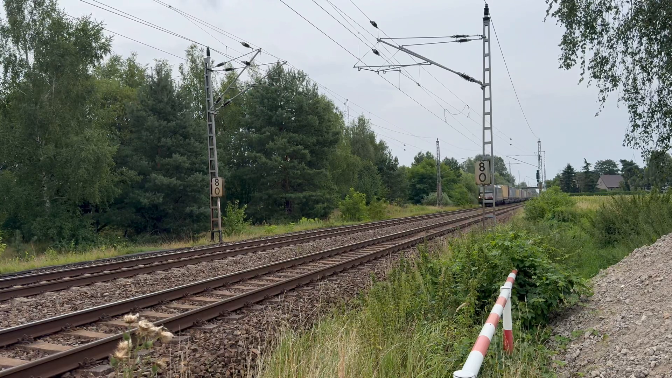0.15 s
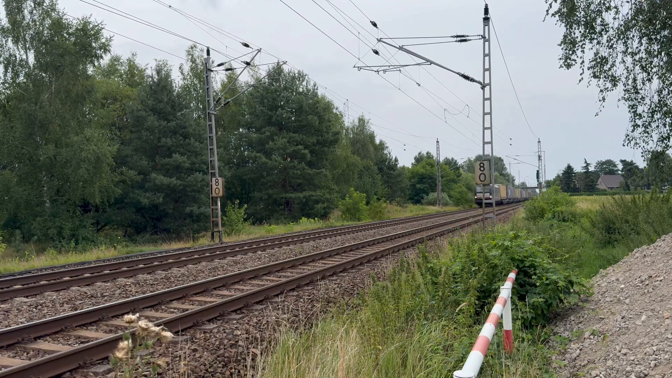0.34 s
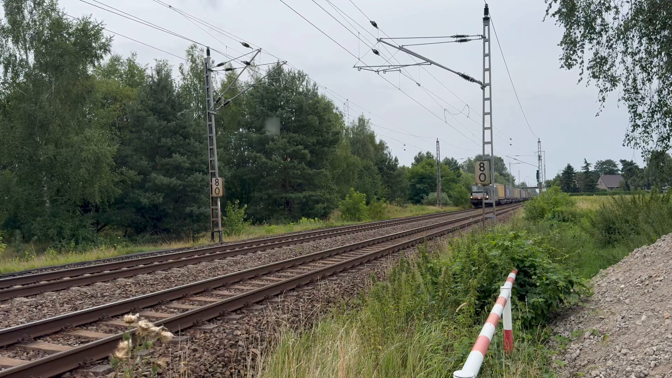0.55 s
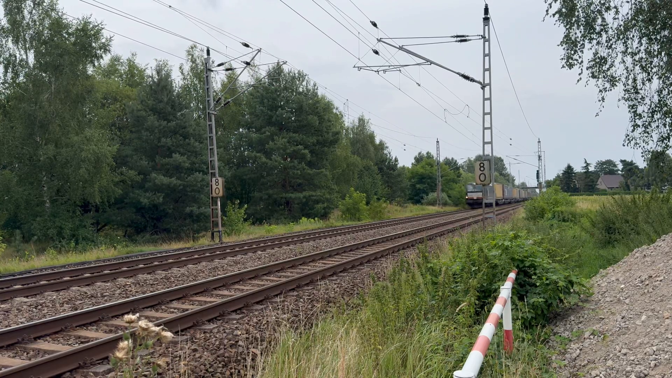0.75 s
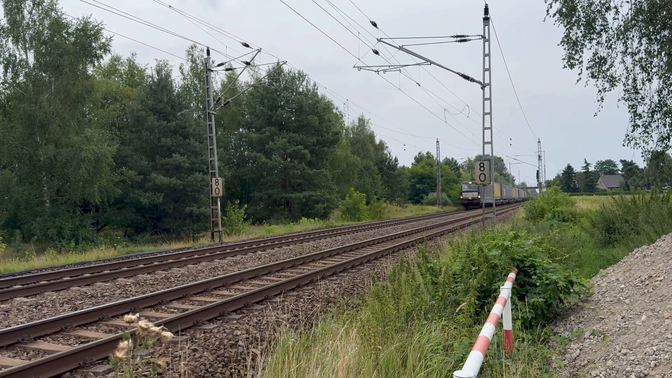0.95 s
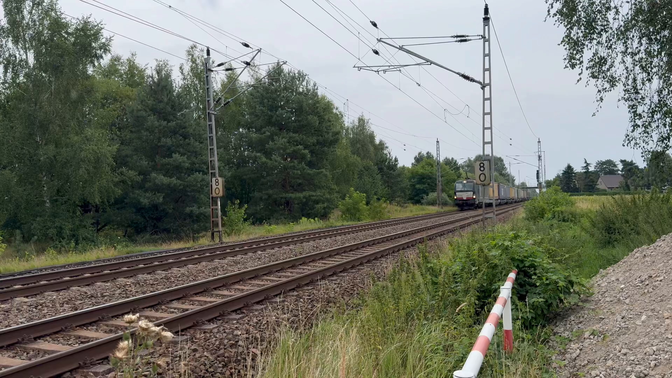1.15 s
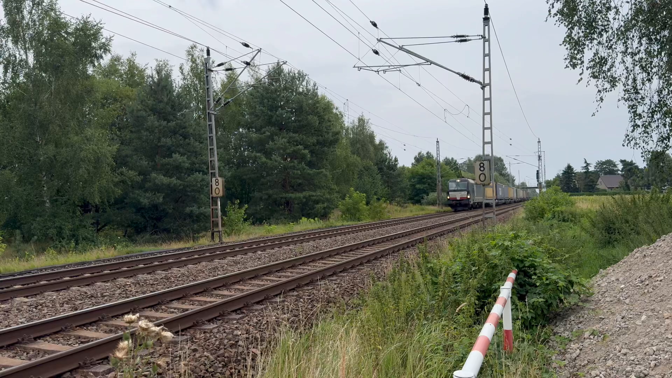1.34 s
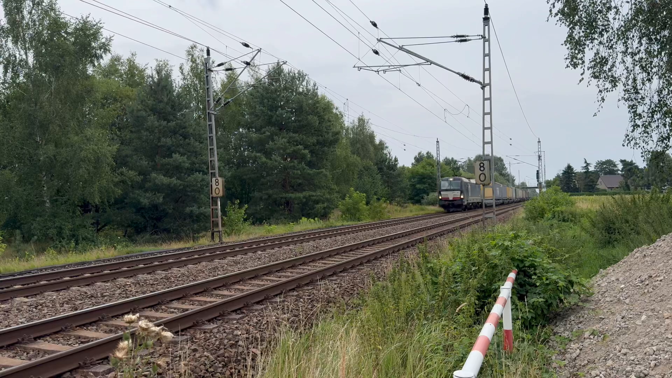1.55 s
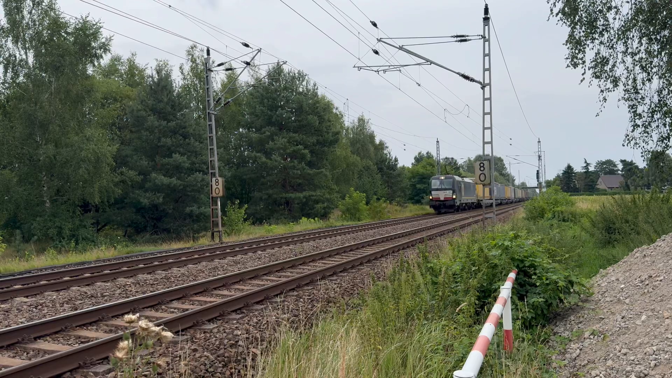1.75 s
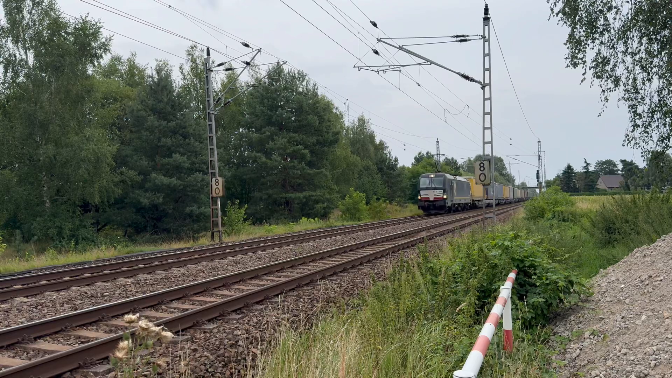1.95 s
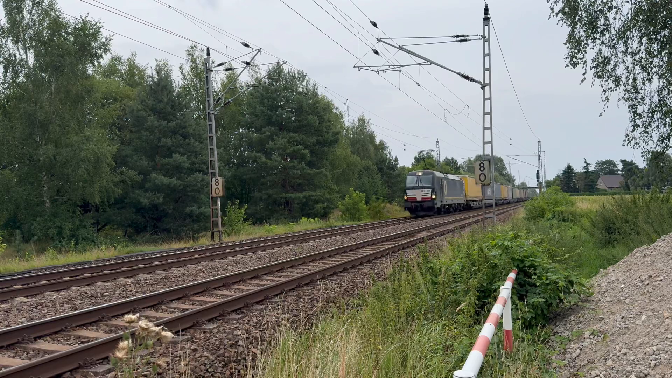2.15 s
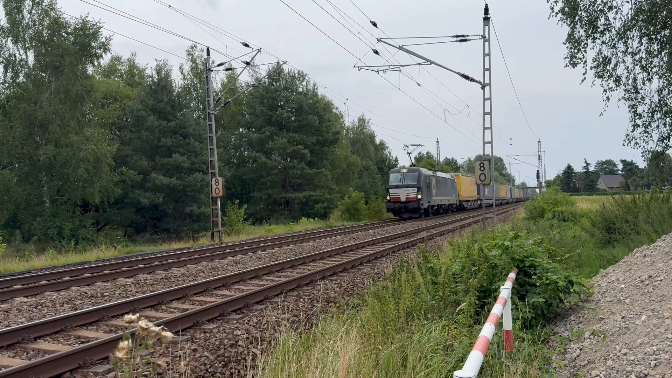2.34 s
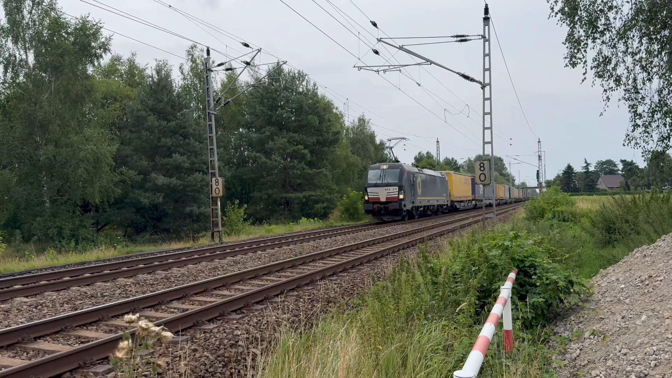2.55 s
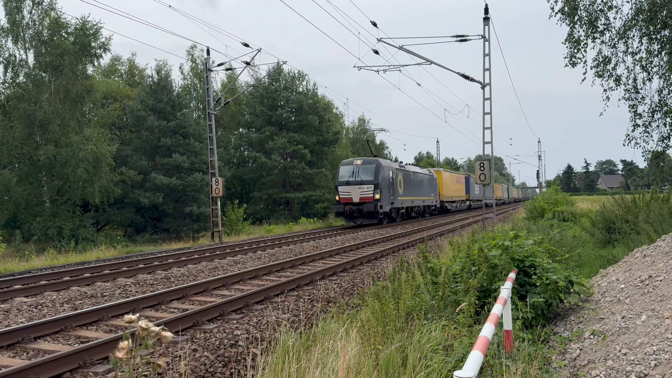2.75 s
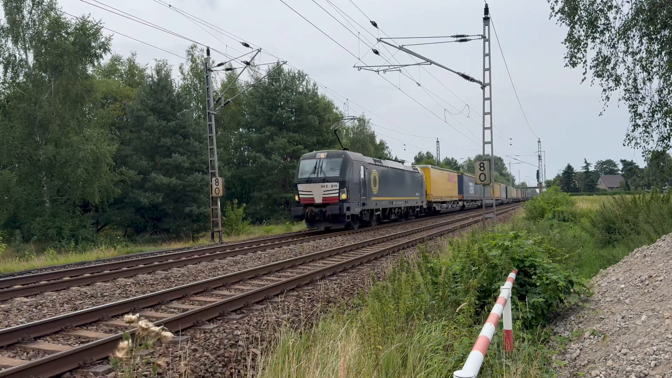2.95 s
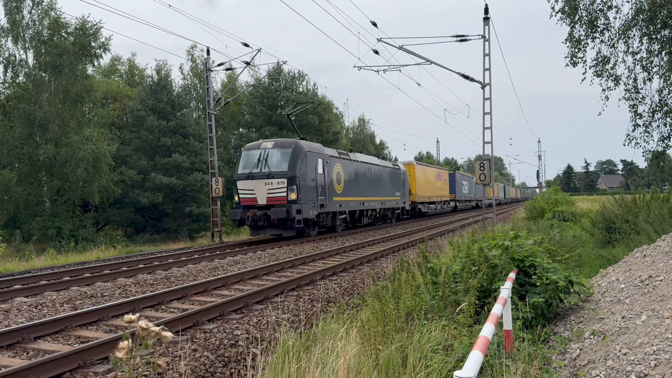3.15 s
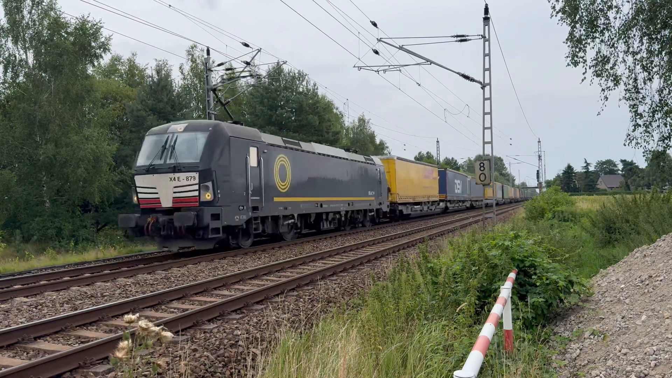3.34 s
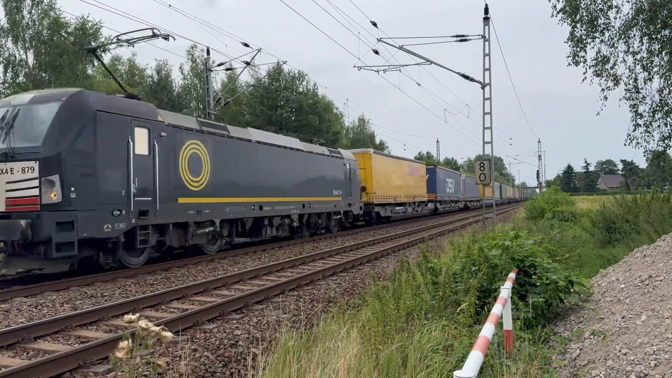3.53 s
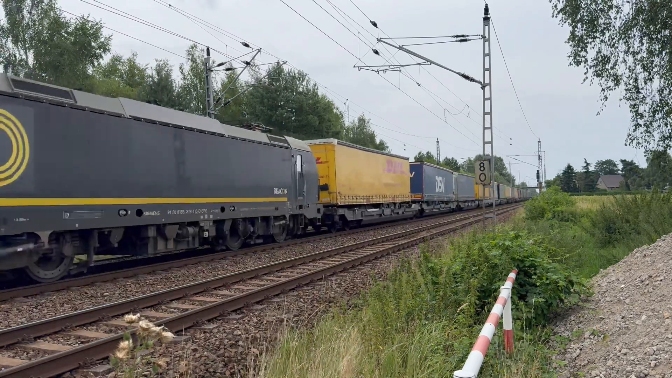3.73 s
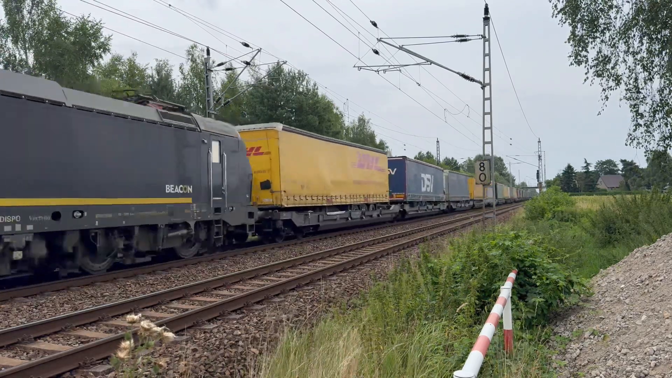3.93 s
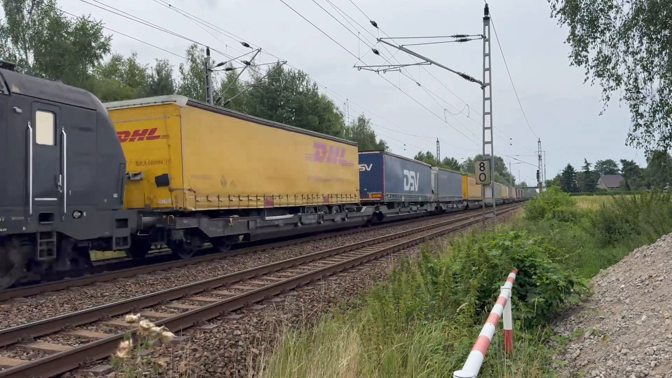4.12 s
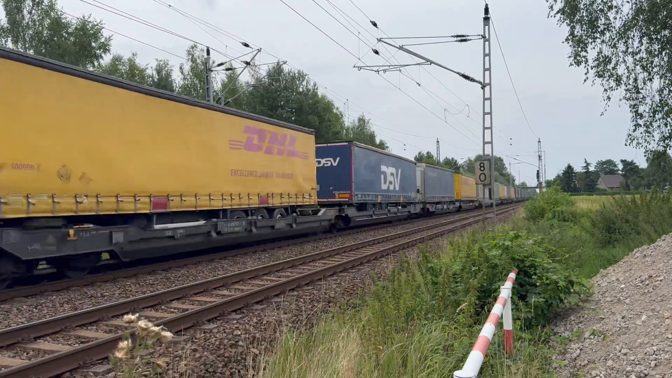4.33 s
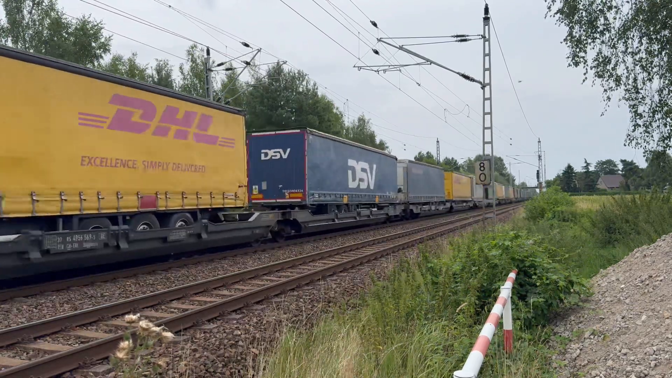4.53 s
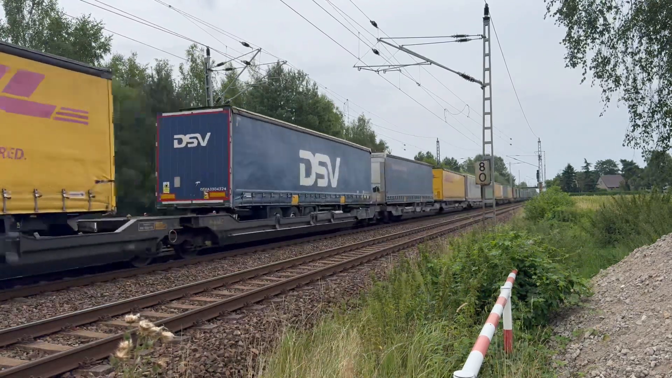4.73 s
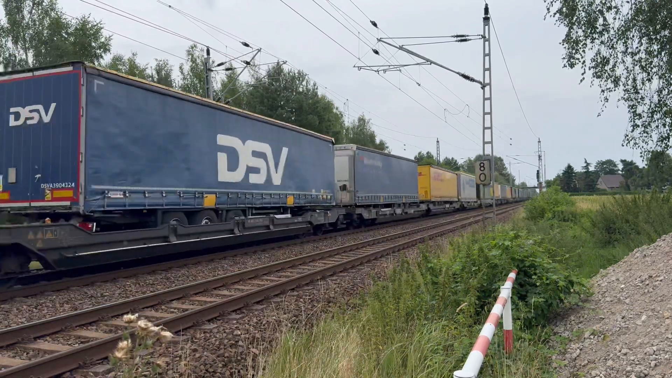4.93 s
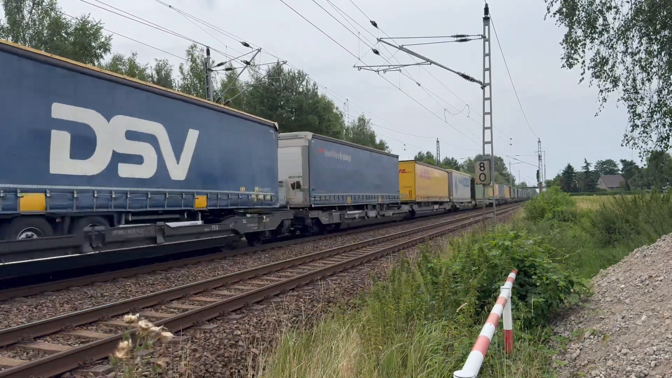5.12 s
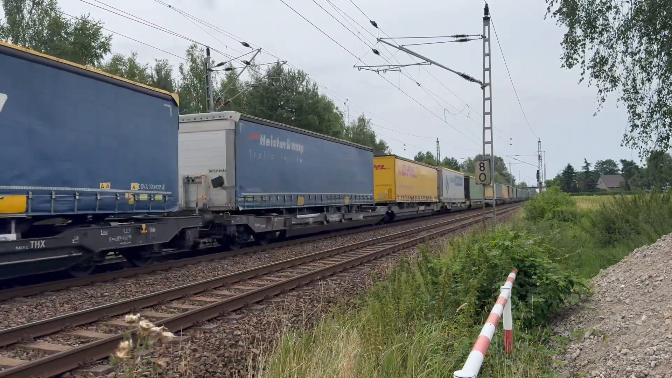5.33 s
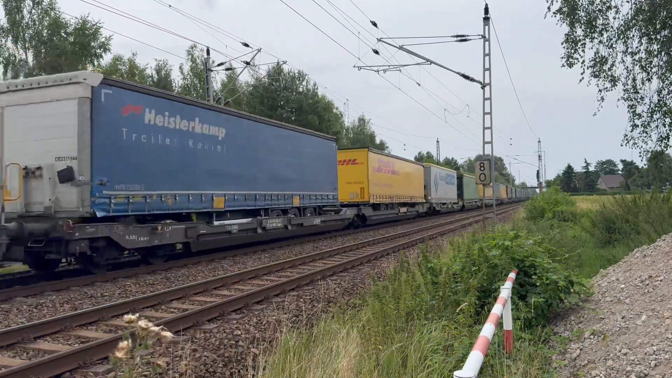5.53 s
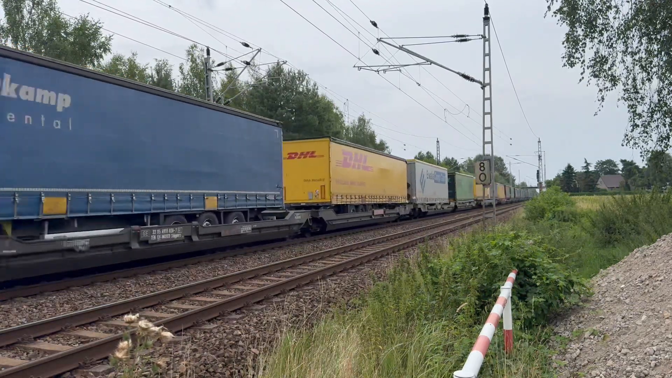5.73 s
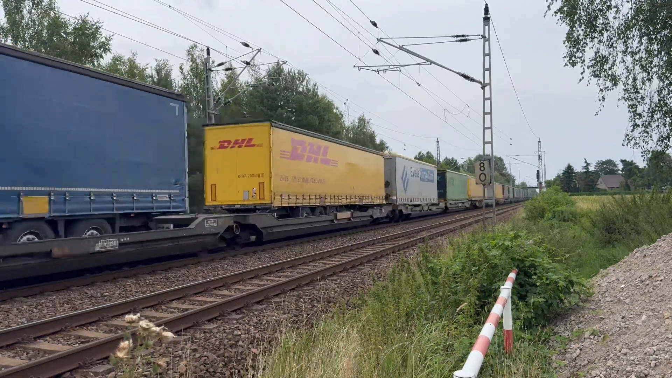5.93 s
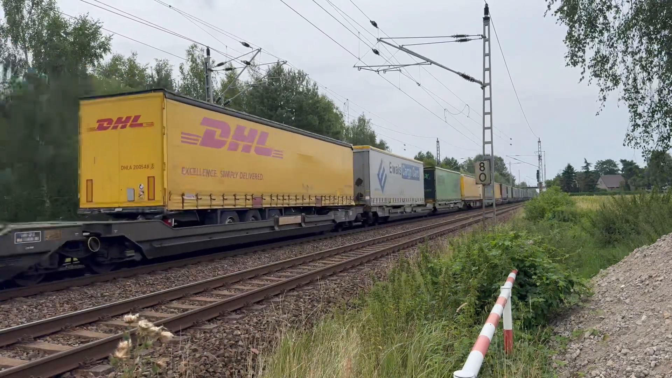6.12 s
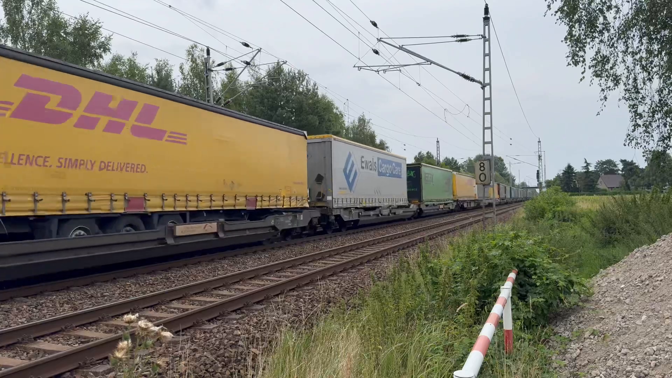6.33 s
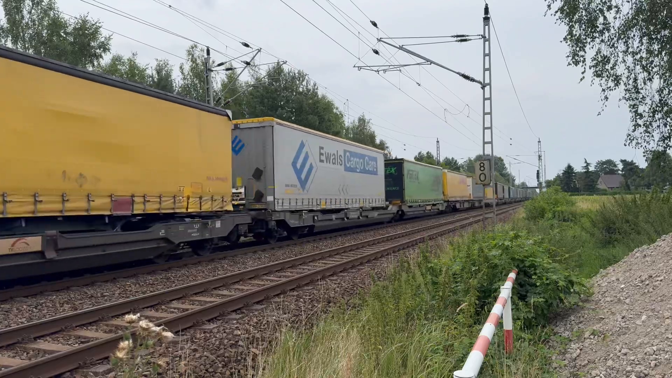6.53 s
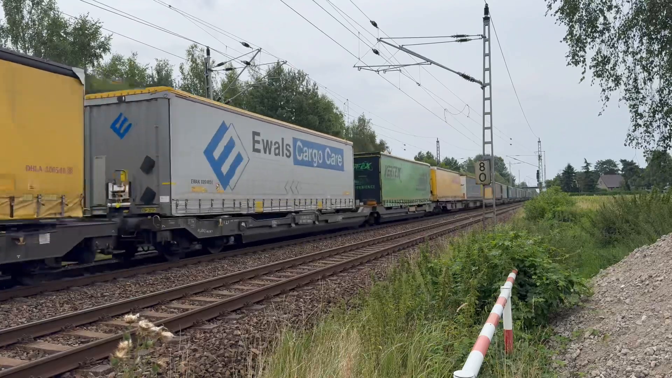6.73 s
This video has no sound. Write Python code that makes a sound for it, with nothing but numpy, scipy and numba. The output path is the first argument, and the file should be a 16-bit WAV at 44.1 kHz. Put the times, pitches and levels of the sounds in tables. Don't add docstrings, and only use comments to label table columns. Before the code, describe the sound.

In a meadow by a railway, a phone stereo microphone stands about eight metres from the track. From 0 to 2.9 seconds a distant freight train gives a low, throbbing rumble and slightly hollow rolling noise, slowly growing, with faint leaf hiss on top. From about 3 seconds it swells fast, brightening; the electric locomotive roars past, loudest around 3.7 to 4.2, with deep wheel rumble, rushing air and a short spit at 3.8. The wagons then roll by, somewhat quieter, in an uneven rumble pulsing with the passing wheel sets. A hard metallic wheel knock strikes at 4.6, and brief rough ringing of wheels and rail comes and goes until about 6.5. A fainter, higher knock sounds near 6.0, then small airy, gritty spits at 6.1 to 6.3, the last strongest. Slipstream hiss flutters over the steady rumble, which continues to the end at about 6.9.

```python
import sys
import numpy as np
from scipy import signal
from scipy.fft import rfft, irfft
from scipy.io import wavfile
from scipy.ndimage import uniform_filter1d, map_coordinates
from numba import njit

SR = 44100
rng = np.random.default_rng(int(sys.argv[2]) if len(sys.argv) > 2 else 0)


def volts(x):
    e = np.asarray(x, float) / 20
    return 10 ** e


def store_pcm(level_fs):
    pcm = np.round(np.clip(level_fs, -1, 1) * 32767).astype(np.int16)
    wavfile.write(sys.argv[1], SR, np.atleast_2d(pcm).T)


N = 302967
T = np.arange(N) / SR
HZ = np.maximum(np.fft.rfftfreq(N, 1 / SR), 1)

# f/Hz, left minus right/dB, likeness/0-1, phase of right/rad
PORTS_ABREAST = [(80, 1.2, 0.98, 0.0), (300, 2.9, 0.85, -0.2), (600, 3.5, 0.7, -0.3), (1000, 4.0, 0.8, 0.1),
                 (1300, 4.1, 0.71, 0.2), (1600, 5.6, 0.24, -0.2), (2100, 3.4, 0.51, -0.5),
                 (2700, 2.6, 0.4, 0.3), (3300, 3.1, 0.44, -0.1), (3900, 5.5, 0.22, 1.5),
                 (4700, 4.7, 0.32, -0.2)]
# f/Hz, left minus right/dB, likeness/0-1, phase of right/rad
PORTS_SLIPSTREAM = [(4800, 5.6, 0.33, -0.6), (5300, 5.5, 0.27, -1.5), (5700, 5.6, 0.15, -2.1),
                    (6300, 4.3, 0.22, -2.3), (7000, 5.3, 0.37, -2.1), (7800, 3.7, 0.63, -3.0),
                    (8800, 0.6, 0.93, -3.1), (10000, 0.3, 0.79, -2.7), (11500, 0.3, 0.59, -2.3),
                    (12400, -0.1, 0.38, -2.5), (13100, 0.1, 0.23, -0.8), (14000, -0.2, 0.55, -0.4),
                    (15000, 0.1, 0.89, -0.1), (15600, -0.1, 0.98, -0.0)]
# f/Hz, level/dB per Hz
SLIPSTREAM = [(4800, -21), (5300, 6), (5700, 3), (6300, -0.5), (7000, 0), (7800, -2), (8800, -5),
              (10000, -6.5), (11500, -8), (12400, -17), (13100, -11.5), (14000, -17), (15000, -18),
              (15600, -25)]


def train(shares, lag, notch_hz):
    band_edges_hz = [135, 750, 1650, 3300]
    # ahead of the middle/m, locomotive abreast/dB,
    # fall per distance (1 = spherical), wagons/dB, wagons fade/(dB/s)
    ground_law = (5, -19.5, 1.1344, -25, 2.2)
    sleeper_law = (-2, -20, 1.4148, -30.5, -0.63)
    rail_law = (-9, -28.5, 0.88, -34.5, -0.73)
    disc_law = (0.5, -26, 1.56, -33, 3)
    contact_law = (.5, -36, 1.35, -41, 0.7)
    # t/s, level over the rumble/dB, length/s
    thuds = [(0.075, 14, 0.04), (0.414, 2.5, 0.29), (0.718, 8, 0.029), (1.202, 7.0, 0.099),
             (1.492, 5.6, 0.043), (1.811, 5, 0.18), (2.04, 5.4, 0.075), (2.205, -1.5, 0.11),
             (2.424, 9, 0.063), (2.699, 3.5, 0.037), (2.794, 2.5, 0.05), (2.988, 3, 0.12),
             (3.148, -12, 0.044), (3.238, 5.5, 0.07), (3.427, -1.5, 0.1), (3.667, 4.5, 0.2),
             (3.732, -1, 0.031), (3.911, 1, 0.036), (4.28, 6.5, 0.22), (4.52, 6.5, 0.083),
             (4.57, -20, 0.046), (4.624, 5.5, 0.064), (4.939, 5, 0.134), (5.208, 3.5, 0.097),
             (5.423, -0.5, 0.122), (5.572, 11, 0.036), (5.842, 7, 0.13), (6.236, 5, 0.17),
             (6.47, 5.5, 0.054), (6.625, 4, 0.15)]
    # t/s, under the wagon/dB, at the wheels/dB, length/s
    bogies = [(2.07, 2.5, -0.5, 0.13), (2.45, 1.5, 1.5, 0.35), (2.98, 1, 0.5, 0.087),
              (3.22, 1, -1.5, 0.081), (3.52, -1.5, -2.5, 0.22), (3.746, -1, 1, .15), (4.11, 2.5, 1.5, 0.21),
              (4.303, 0.5, 0, .1), (4.554, -1.5, 2.5, 0.23), (4.82, 1.5, 0, 0.073), (5.12, 1.5, 2, 0.23),
              (5.65, 0, 0.5, 0.19), (6.2, 0, -1.5, 0.32), (6.348, 1.5, 2.5, 0.097), (6.55, 1, 0.5, 0.08),
              (6.8, 1, 1.5, 0.19)]
    bogie_shares = ((0.98, .01), (0.51, 0.23), (.01, 1), (.01, 0.88))

    stages = (far_train(notch_hz), locomotive(lag), wagon_row(lag))
    rumble, *upper = zip(*(bands(x, band_edges_hz) for x in stages))
    ground_db = passing(*ground_law) + bumps(thuds) + 0.73 * walk(25)
    out = mix([even(x, 0.048) for x in rumble], shares, ground_db)
    laws = (sleeper_law, rail_law, disc_law, contact_law)
    for parts, law, (under, at_wheels) in zip(upper, laws, bogie_shares):
        swells = [(s, under * low + at_wheels * high, seconds) for s, low, high, seconds in bogies]
        out = out + mix(parts, shares, passing(*law) + bumps(swells) + 0.7 * walk(16))
    return out


def far_train(notch_hz):
    # f/Hz, level/dB per Hz
    colour = [(25, -27), (40, -5), (75, 6.5), (105, -5), (140, -19), (270, -21), (600, -17), (750, -15.5),
              (1100, -10), (1350, -12.5), (1900, -27.5), (2500, -30.5), (3300, -38), (4900, -41)]
    # f/Hz, left minus right/dB, likeness/0-1, phase of right/rad
    ports = [(80, 1.7, 1.0, 0.0), (300, 0.5, 0.98, 0.1), (600, 0.4, 0.82, 0.1), (800, 5.9, 0.61, -1.5),
             (1050, 6.5, 0.43, -3.2), (1350, 3.7, 0.55, -2.7), (1800, -0.5, 0.67, 0.2),
             (2200, -0.8, 0.88, 0.1), (2600, 0.2, 0.93, -0.0), (3100, 0.3, 0.85, -0.1),
             (3500, 1.0, 0.26, -0.4), (3900, 2.9, 0.3, -1.0), (4400, 1.9, 0.56, -0.1),
             (5000, 0.7, 0.87, 0.0)]
    # f/Hz, width/Hz, level over the rolling noise/dB
    modes = [(186.5, 80, 3), (589, 153, 0.5), (863, 145, 2.5), (1076, 150, -2.5), (1240, 110, -1.5),
             (1890, 120, 3), (2286, 74, 2.5), (3930, 140, 4)]
    left, right = rolling(colour, ports, modes, 1.2, 6.4)
    return np.array([notch(left, notch_hz, 410.0, 0.99), notch(right, notch_hz, 420.0, 0.73)])


def locomotive(lag):
    # f/Hz, level/dB per Hz
    colour = [(25, -16), (40, -6.5), (75, 11), (105, -1.5), (150, -11), (220, -9.5), (400, -11.5),
              (620, -13.5), (900, -5.5), (1500, -10), (2200, -18), (2800, -22.5), (3400, -23.5),
              (5000, -22)]
    # f/Hz, width/Hz, level over the rolling noise/dB
    modes = [(199, 63, -0.5), (246, 94, -2.5), (600, 130, -1.7), (1460, 160, -4), (1880, 160, -1.3),
             (2170, 160, 3), (2970, 130, 6)]
    return lagged(rolling(colour, PORTS_ABREAST, modes, 1.1, 9.0), lag)


def wagon_row(lag):
    # f/Hz, level/dB per Hz
    colour = [(25, -6), (40, -1), (80, 4.5), (105, 3), (145, -12), (250, -10.5), (450, -10), (700, -15),
              (1000, -15), (1400, -15.5), (2000, -16.5), (2650, -19.5), (3400, -21), (5000, -24.5)]
    # f/Hz, width/Hz, level over the rolling noise/dB
    modes = [(255, 42, 1), (344, 83, -4.5), (1300, 93, 1), (1465, 100, 4.5), (1790, 100, -0.5),
             (2350, 270, -2.5), (3030, 190, 3.5), (3880, 120, 1.5)]
    return lagged(rolling(colour, PORTS_ABREAST, modes, 0.75, 10.0), lag)


def rolling(colour, ports, modes, patchy_db, rate):
    out = irfft(arrive(colour, ports), N)
    for hz, width, db in modes:
        peak = volts(db) / (1 + (2 * (HZ - hz) / width) ** 2)
        out += volts(patchy_db * walk(rate)) * irfft(arrive(colour, ports) * peak, N)
    return out


def passing(ahead_m, loco_db, fall, wagons_db, fade_db_s):
    speed_m_s, track_m = 24.8, 8.13
    passes_s, loco_half_m = 3.937, 4.1
    wagons_s, wagons_rise_s = 4.52, 0.12
    along = np.maximum(np.abs(speed_m_s * (T - passes_s) + ahead_m) - loco_half_m, 0)
    loco = volts(loco_db - fall * 10 * np.log10(1 + (along / track_m) ** 2))
    row = volts(wagons_db - fade_db_s * (T - wagons_s)) / (1 + np.exp((wagons_s - T) / wagons_rise_s))
    return 20 * np.log10(np.hypot(loco, row))


def singing(lag):
    # t/s, length/s, f/Hz, level/dB
    wheels = [(3.707, 0.33, 600, -29), (4.083, 0.089, 2170, -38), (4.093, 0.058, 1860, -28),
              (4.583, 0.44, 1790, -28.5), (4.746, .1, 2350, -35), (5.0, 0.22, 1300, -31),
              (5.2, .16, 1300, -28), (5.153, 0.32, 1790, -30), (5.3, 0.19, 1580, -33),
              (5.62, 0.073, 3030, -30), (5.68, 0.12, 3760, -33), (6.053, 0.24, 1465, -30),
              (6.447, .25, 1300, -43), (6.5, 0.13, 272, -39)]
    out = np.zeros(N)
    for s, seconds, hz, db in wheels:
        resonance = 1 / (1 + (2 * (HZ - hz) / (0.052 * hz)) ** 2)
        ring = irfft(rfft(rng.standard_normal(N)) * resonance, N)
        nearness = np.exp(-(2 * (T - s) / seconds) ** 4)
        out += volts(db) * nearness * ring / ring.std()
    return lagged(np.array([out, out * volts(-5.0)]), lag)


def knocks(lag):
    # t/s, peak/dB, f/Hz
    hits = [
        (4.6165, -9, 1350),
        (5.9939, -19, 1460),
    ]
    out = np.zeros(N)
    t = np.arange(SR // 10) / SR
    swell = t / 0.0025 * np.exp(1 - t / 0.0025)
    thump = 0.7 * np.sin(2 * np.pi * 110 * t)
    for s, db, hz in hits:
        ring = np.sin(2 * np.pi * hz * t) + 0.35 * np.sin(2 * np.pi * 1.6 * hz * t)
        start = int(s * SR)
        out[start:start + len(t)] += volts(db) * swell * (ring + thump)
    return lagged(np.array([out, out * volts(-5.0)]), lag)


def air(alongside):
    # ahead of the middle/m, locomotive abreast/dB, fall per distance, wagons/dB, fade/(dB/s)
    law = (1, -40, 0.75, -46, 0.3)
    db = passing(*law)
    parts = [leaves(), slipstream()]
    steady = mix(parts, [1 - alongside, alongside], db + 3.0 + 0.58 * walk(8.1))
    return steady + spits(db)


def slipstream():
    # t/s, level/dB, length/s
    top_swells = [(3.6, -2, .2), (3.95, 2, .2), (4.38, -6, .04), (4.52, -6, .03), (4.66, 2, .12), (5.06, -3, .06),
                  (5.45, -2.5, .12), (5.64, -13, .07), (5.9, -1, .2), (6.13, -9, .03), (6.25, -4, .08),
                  (6.36, 3, .1)]
    return flutter(hiss(SLIPSTREAM, PORTS_SLIPSTREAM), bumps(top_swells) - 1.2)


def spits(stream_db):
    # t/s, peak/dB, time to fall by 60 dB/s
    bursts = [
        (3.7767, -26, 0.23),
        (6.111, -29, 0.15),
        (6.1663, -29, 0.17),
        (6.3139, -22.5, 0.2),
    ]
    bright = hiss(SLIPSTREAM, PORTS_SLIPSTREAM, tilt=0.97)
    gate = 0
    for s, db, t60 in bursts:
        decay = np.exp(-np.log(1000) * np.maximum(T - s, 0) / t60)
        gate = gate + volts(db - 7.0) * (T > s) * decay
    return gate * bright / bright.std()


def leaves():
    # f/Hz, level/dB per Hz
    colour = [(4800, -44), (5300, -13), (5700, 1), (6300, -2.5), (7000, 4), (7800, -9.5), (8800, 5.5),
              (10000, -5), (11500, -0.5), (12400, -8), (13100, -0.5), (14000, -7), (15000, -13),
              (15600, -0.5)]
    # f/Hz, left minus right/dB, likeness/0-1, phase of right/rad
    ports = [(4800, 0.6, 0.88, -0.0), (5300, 1.6, 0.65, 0.0), (5700, 5.1, 0.4, -0.8),
             (6300, 4.1, 0.57, -2.3), (7000, 3.2, 0.78, -2.8), (7800, 1.2, 0.81, -3.1),
             (8800, 0.7, 0.85, -3.1), (10000, 0.1, 0.78, -2.8), (11500, 0.1, 0.74, -2.1),
             (12400, -0.0, 0.52, -2.0), (13100, -0.5, 0.26, -2.3), (14000, 0.2, 0.56, -1.0),
             (15000, 0.0, 0.69, -0.7), (15600, -0.0, 0.89, -0.1)]
    return hiss(colour, ports)


def hiss(colour, ports, tilt=0):
    fade_in = 1 / (1 + (5200 / HZ) ** 12)
    return irfft(arrive(colour, ports) * (HZ / 9000) ** tilt * fade_in, N)


def flutter(x, db):
    edges_hz = [8600, 9400, 10200, 10900, 11600, 12300, 13000, 13700, 14400, 15100]
    low, *tops = bands(x, edges_hz, order=40)
    mid = sum(volts(np.minimum(db, 2) + 3.3 * walk(32)) * (left + right) / 2 for left, right in tops)
    side = sum((left - right) / 2 for left, right in tops)
    return low + np.array([mid + side, mid - side])


def arrive(colour, ports):
    hz, db = np.transpose(colour)
    octaves_outside = np.abs(np.log2(HZ / np.clip(HZ, hz[0], hz[-1])))
    db = np.interp(np.log(HZ), np.log(hz), db) - 30 * octaves_outside
    hz, *columns = np.transpose(ports)
    pan_db, like, phase = (np.interp(np.log(HZ), np.log(hz), c) for c in columns)
    like = like ** 0.82
    shared, own = rfft(rng.standard_normal((2, N)))
    right = volts(-pan_db) * (like * np.exp(1j * phase) * shared + np.sqrt(1 - like ** 2) * own)
    return volts(db) * np.array([shared, right])


def lagged(x, lag):
    return np.array([x[0], map_coordinates(x[1], [np.arange(N) - lag], order=3, mode="nearest")])


@njit
def notch(x, hz, width, depth):
    out, band, low = np.empty(len(x)), 0., 0.
    for i in range(len(x)):
        g, damping = np.tan(np.pi * hz[i] / SR), width / hz[i]
        v = (band + g * (x[i] - low)) / (1 + g * (g + damping))
        band = 2 * v - band
        low = low + 2 * g * v
        out[i] = x[i] - depth * damping * v
    return out


def bands(x, edges_hz, order=8):
    below = [1 / (1 + (HZ / edge) ** order) for edge in edges_hz]
    shapes = np.diff([0 * HZ, *below, 1 + 0 * HZ], axis=0)
    return irfft(rfft(x) * shapes[:, None], N)


def even(x, seconds):
    size = int(seconds * SR)
    power = uniform_filter1d(uniform_filter1d(np.mean(x ** 2, axis=0), size), size)
    return x / np.sqrt(power + 0.13 * power.mean())


def mix(parts, shares, db):
    out = 0
    for x, share in zip(parts, shares):
        power = np.sum(share * x.mean(axis=0) ** 2) / np.sum(share)
        out = out + x * np.sqrt(share / power)
    return out * volts(db)


def bumps(rows):
    return sum(db * np.exp(-np.log(16) * ((T - s) / seconds) ** 2) for s, db, seconds in rows)


def walk(rate):
    k = int(SR / rate)
    steps = np.repeat(rng.standard_normal(N // k + 1), k)
    return 2.13 * uniform_filter1d(uniform_filter1d(steps, k), k)[:N]


def read(table):
    s, *columns = np.transpose(table)
    return [np.interp(T, s, c) for c in columns]


def scene():
    # t/s, train alongside/0-1, wagons' part of that/0-1, right port lag/samples, notch f/Hz
    place = [
        (0, 0.05, 0.17, 1.1, 1580),
        (2.9, 0.08, 0, 1.6, 1590),
        (3.3, 0.15, 0, 1.6, 1710),
        (3.7, 0.38, 0.03, 4.8, 1790),
        (3.86, 0.9, 0.03, 13.6, 1830),
        (4.0, 0.77, 0.13, 20.2, 1830),
        (4.35, 0.9, 0.15, 18.7, 1850),
        (4.65, 0.99, 1, 19.6, 1880),
        (6.87, 0.93, 0.97, 17.6, 1850),
    ]
    loco, wagons, lag, notch_hz = read(place)
    loco, wagons = np.clip(loco, 0, 1), np.clip(wagons, 0, 1)
    shares = [1 - loco, loco * (1 - wagons), loco * wagons]
    return train(shares, lag, notch_hz) + singing(lag) + knocks(lag) + air(loco ** 0.73)


def low_pass(x):
    return signal.sosfilt(signal.butter(12, 15740, fs=SR, output="sos"), x)


def record(dry):
    top_hz = 15650
    dry = signal.sosfilt(signal.butter(3, 38, "high", fs=SR, output="sos"), dry)
    dry = signal.sosfilt(signal.ellip(12, 0.2, 70, top_hz, fs=SR, output="sos"), dry)
    return low_pass(dry)


dry = scene()
out = record(dry)
store_pcm(out)
```